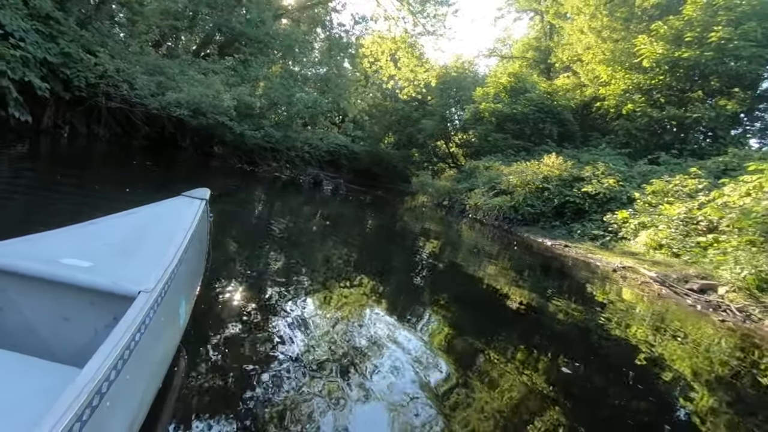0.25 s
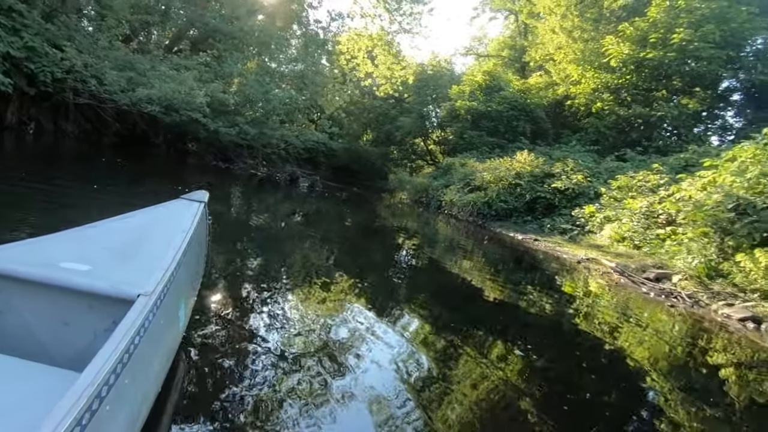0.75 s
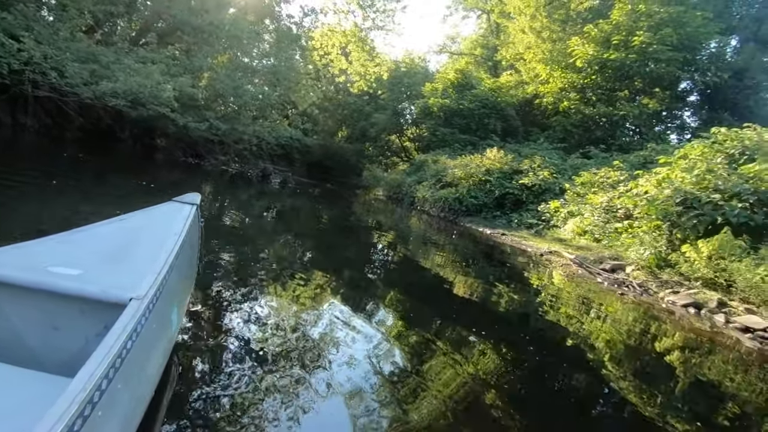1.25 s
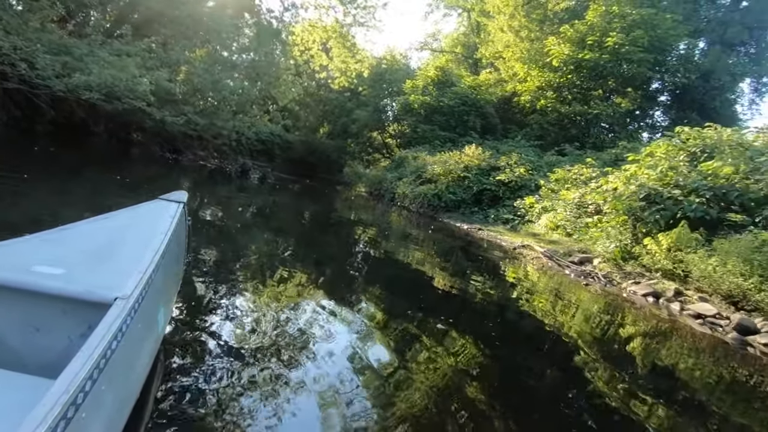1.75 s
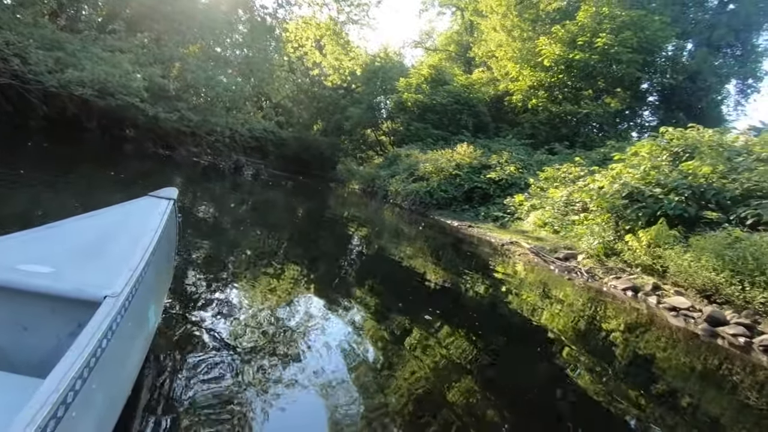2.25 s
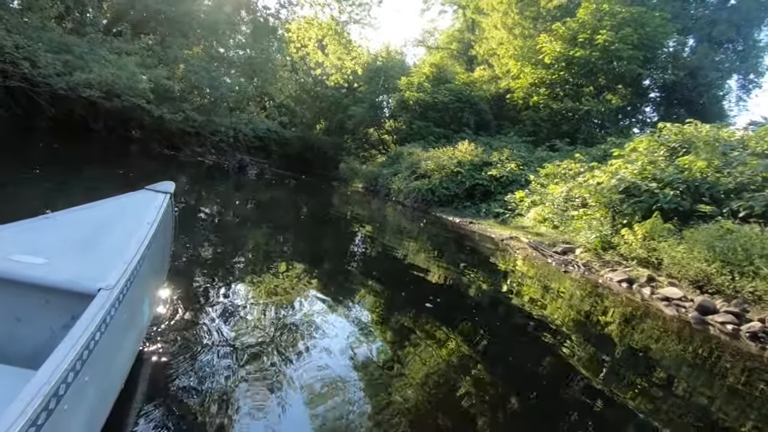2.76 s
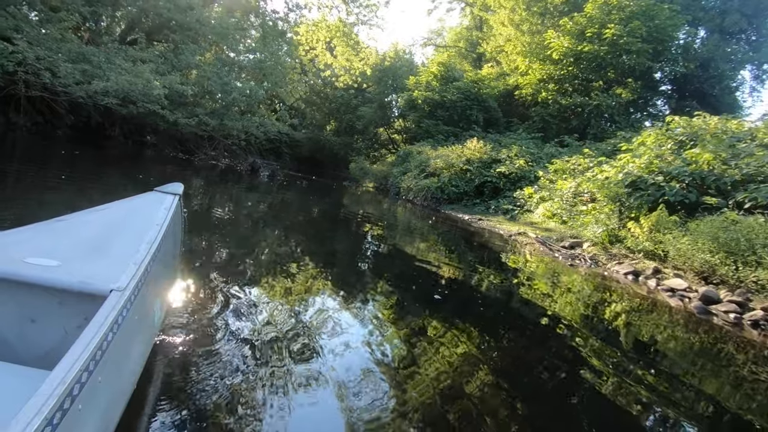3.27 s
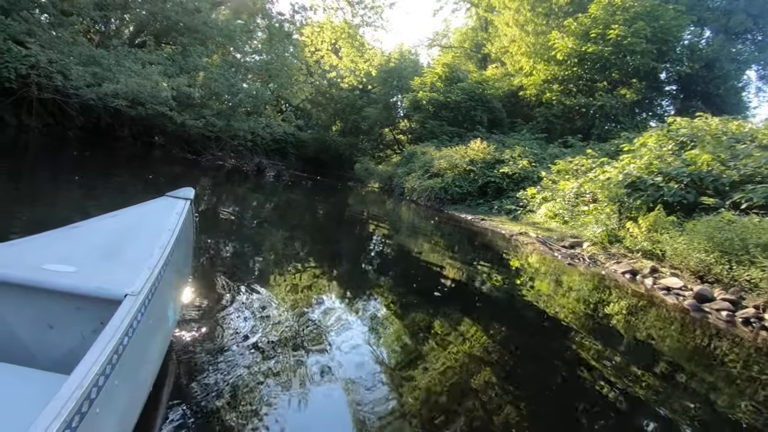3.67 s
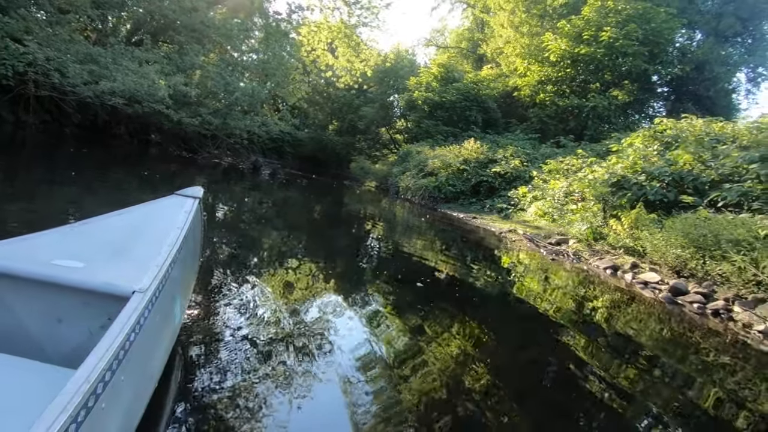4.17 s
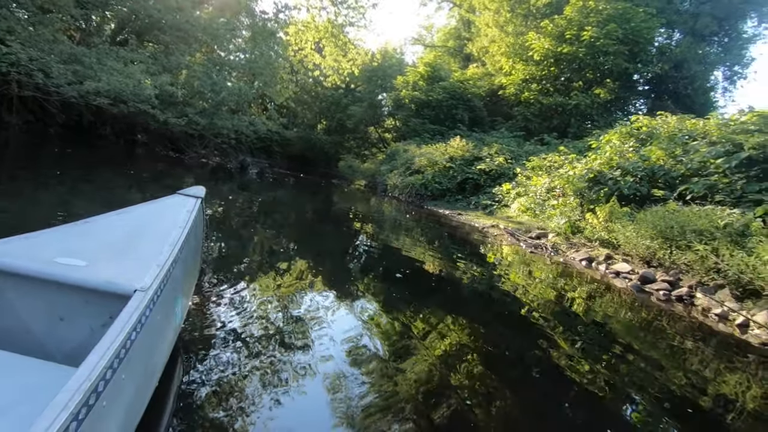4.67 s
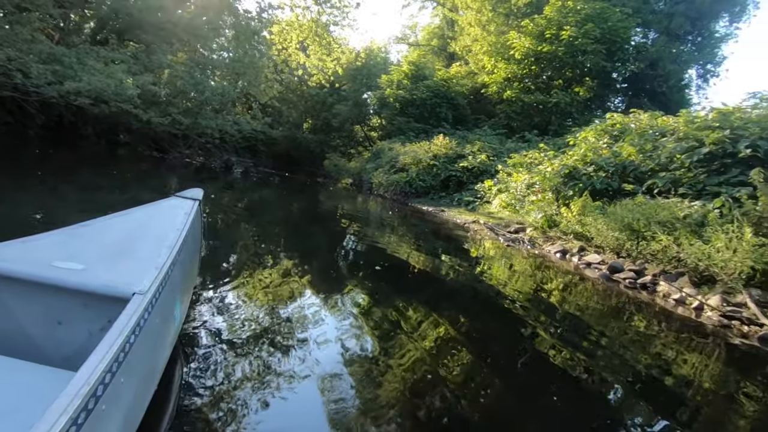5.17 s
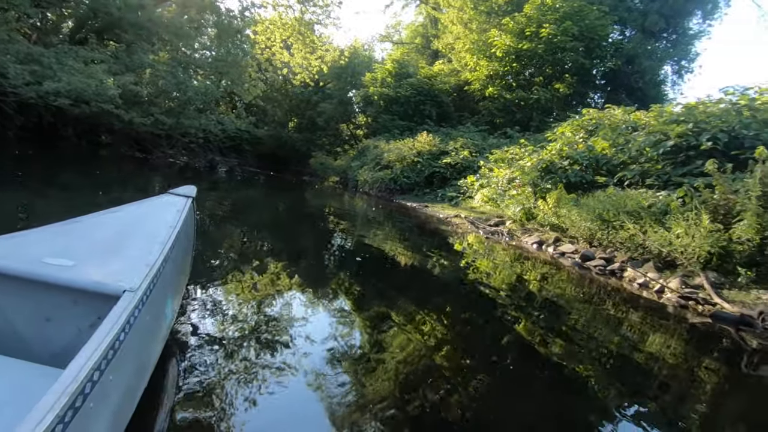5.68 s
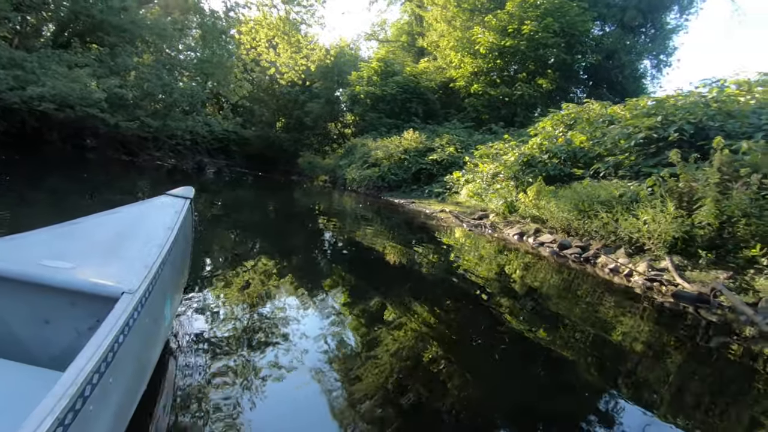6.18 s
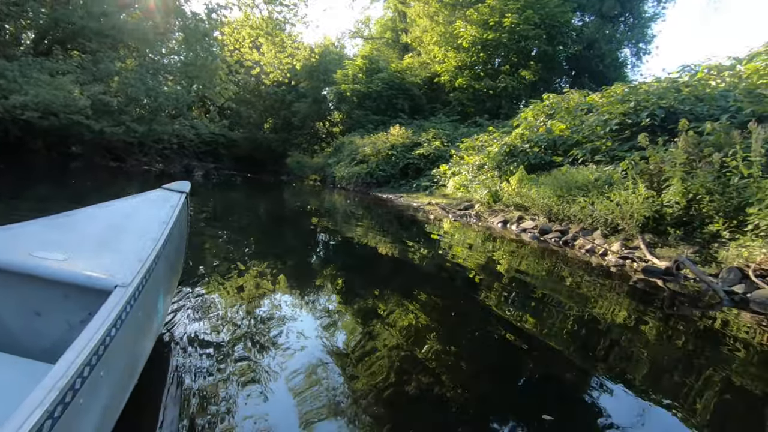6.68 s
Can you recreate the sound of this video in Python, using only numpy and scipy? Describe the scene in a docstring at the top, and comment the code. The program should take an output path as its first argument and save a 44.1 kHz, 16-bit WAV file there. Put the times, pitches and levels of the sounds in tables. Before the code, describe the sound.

A camera mounted on a metal canoe picks up quiet outdoor air, rumbling and gently hissing, with a wavering motor far away. After light plops and a crisp flutter of cloth, the hull is bumped: a moderate thud, then several loud, boomy, clattering blows with short rings. The stereo ambience narrows to a muffled centre, with slight wind thumps, cloth rustle and one short sharp bang.

```python
"""A low rumble, leaves and insects over a calm river with a far engine humming; bubbles plop at the hull, then
knocks on a drifting aluminium canoe boom into the camera through its mount, as decaying modes and noise bursts.
Cloth snaps and brushes near the microphone as shaped bright noise; the air is coloured, patchy noise.
The camera fades from its pair of ports to one sheltered port, and its gain control ducks after loud knocks."""
import sys
import numpy as np
from scipy import signal
from scipy.fft import rfft, irfft, next_fast_len
from scipy.io import wavfile
from scipy.ndimage import uniform_filter1d, minimum_filter1d, map_coordinates

SR = 44100
rng = np.random.default_rng(int(sys.argv[2]) if len(sys.argv) > 2 else 0)


def unload_wav(signal):
    """Save mono or channel-first audio to the path in sys.argv[1] as 16-bit WAV at rate SR, clipped to [-1, 1]."""
    wavfile.write(
        sys.argv[1],
        SR,
        np.round(np.clip(np.atleast_2d(signal).T, -1, 1) * 32767).astype(np.int16),
    )


N = 305877


def amp(db):
    """Gain of a level in dB."""
    return 10 ** (np.asarray(db) / 20)


def unit(x):
    """x at rms 1."""
    return x / np.sqrt(np.mean(x ** 2) + 1e-20)


def along(points, hz):
    """Each column after the frequency, read on a log axis."""
    f, *cols = np.transpose(points)
    return [np.interp(np.log(hz + 1), np.log(f + 1), c) for c in cols]


def wobble(rate):
    """A smooth random curve, rate knots a second."""
    knots = rng.standard_normal(int(N * rate / SR) + 4)
    return map_coordinates(knots, [np.arange(N) * rate / SR])


def bells(rows):
    """Gain of a sum of bell-shaped swells; each width is the standard deviation in seconds."""
    t = np.arange(N) / SR
    return sum(amp(db) * np.exp(-.5 * ((t - s) / width) ** 2) for s, db, width in rows)


def strokes(rows):
    """Gain of a sum of rise-hold-fall shapes."""
    t = np.arange(N) / SR
    gain = np.zeros(N)
    for s, db, rise, hold, fall in rows:
        shape = np.interp(t - s, np.cumsum([0, rise, hold, fall]), [0, 1, 1, 0])
        gain += amp(db) * np.sin(np.pi / 2 * shape) ** 2
    return gain


def filtered(x, response):
    """x times a complex response of frequency."""
    m = next_fast_len(N + 8192)
    return irfft(rfft(x, m) * response(np.fft.rfftfreq(m, 1 / SR)), m)[..., :N]


def patchy(count, patchy_db):
    """White noises, of rms 1 together, under one field of random gain patches in time and frequency."""
    z = signal.stft(rng.standard_normal((count, N)), nperseg=512)[2]
    field = uniform_filter1d(rng.standard_normal(z.shape[1:]), size=6, axis=0)
    field = uniform_filter1d(field, size=14, axis=1)
    return unit(signal.istft(z * amp(patchy_db * unit(field)), nperseg=512)[1][:, :N])


def coloured(spectrum, patchy_db):
    """One noise of rms 1 with this spectrum."""
    white = patchy(count=1, patchy_db=patchy_db)[0]
    return unit(filtered(white, lambda hz: amp(along(spectrum, hz)[0])))


def at_pair(table, inside, patchy_db):
    """Noise at two ports: the left hears part of what the right hears, shifted in phase, and part of its own."""
    def paths(hz):
        left_db, right_db, alike, lead = along(table, hz)
        alike = np.clip(alike, 0, 1)
        per_hz = np.sqrt(SR / 2) * inside(hz)
        left_shared = amp(left_db) * alike * np.exp(1j * lead)
        left_own = amp(left_db) * np.sqrt(1 - alike ** 2)
        return per_hz * [left_shared, left_own, amp(right_db)]
    shared, own = patchy(count=2, patchy_db=patchy_db)
    heard = filtered(np.array([shared, own, shared]), paths)
    return np.array([heard[0] + heard[1], heard[2]])


def river_air():
    """Far rumble that comes in lumps, and a smoother rush of leaves and insects above it, at the pair of ports."""
    # both: f/Hz, left and right level/dB per Hz before the layer's gain, likeness/0-1, left lead/rad
    rumble_spectrum = [(22.0, -60, -69, 0.6, -0.5), (41.7, -59.5, -60.5, 0.7, -0.2),
                       (59.5, -47, -51.5, 1, -0.36), (129, -59, -56.5, 0.84, -0.54),
                       (189, -60.5, -58.5, 0.7, -0.83), (265, -70, -66, 1, -0.54),
                       (340, -71.5, -67, 0.7, -0.37), (407, -74, -71, 0.8, -0.36),
                       (536, -83.5, -72.5, 0.5, 0.2)]
    leaves_spectrum = [(563, -86.5, -74, 0.19, 0.2), (656, -69.5, -68, 0.73, 4),
                       (770, -78, -69.5, 0.93, 1.5), (1010, -73, -70, 0.96, 2),
                       (1354, -76.5, -74, 0.84, 1.48), (2265, -87, -85.5, 0.14, 0.7),
                       (3290, -95.5, -93.5, 0.52, 0.4), (4330, -102.3, -99.5, 0.52, 0.5),
                       (4970, -99.2, -94.5, 0.19, 3.5), (5490, -96.5, -86.5, 0.74, 4.5),
                       (6140, -99.0, -98, 0.28, 3.5), (6700, -93, -96, 0.31, 4.5),
                       (7600, -104.4, -107.6, 0.13, 4.5), (8100, -113.8, -115.4, 0.06, -2),
                       (9200, -118.5, -118.4, 0.03, 7.5), (12450, -123.5, -123.5, 0.01, -7.5),
                       (14500.0, -140.0, -140.0, 0.06, -5.5)]
    # the rumble swells once, around the second loud knock:
    # t/s, added level/dB against steady, standard deviation/s
    rumble_swell = (5.09, 8.8, 0.2)
    rumble_db, leaves_db = -0.9, 0.16
    # the pair's rush of leaves fades from then on, on top of the handover
    leaves_fade_s, leaves_fade_db_per_s = 4.85, 10.5
    leaves_fade_db = leaves_fade_db_per_s * np.maximum(0, np.arange(N) / SR - leaves_fade_s)
    rumble = at_pair(rumble_spectrum, lambda hz: hz < 540, patchy_db=1.0)
    rumble = rumble * (1 + bells([rumble_swell])) * amp(rumble_db + 1.2 * wobble(1.8) + 0.13 * wobble(11.0))
    leaves = at_pair(leaves_spectrum, lambda hz: hz >= 540, patchy_db=0.5)
    return rumble + leaves * amp(leaves_db - leaves_fade_db + 0.78 * wobble(1.7))


def sheltered_air():
    """Steady background noise at the single port, with a low wind thump under a light breeze and two gusts."""
    # background and wind: f/Hz, relative level/dB per Hz
    background_spectrum = [(12, -28), (22, 0), (64, -8.5), (160, -4), (260, -9.5), (400, -16), (600, -23),
                           (1000, -20), (1700, -27), (2400, -38), (3300, -50.5), (4300, -44.5), (5300, -40),
                           (6800, -46.5), (7600, -61), (9000, -68.5), (14000, -91)]
    wind_spectrum = [(12, -21), (30, 8), (70, 4.5), (120, -16), (250, -47.5), (600, -120)]
    # gusts: t/s, peak level/dB added to the breeze, standard deviation/s
    gusts = [(6.2, -35, 0.03), (6.8, -37.5, 0.1)]
    background_db, breeze_db = -33.5, -40
    background = amp(background_db) * coloured(background_spectrum, patchy_db=0.9)
    return background + (amp(breeze_db) + bells(gusts)) * coloured(wind_spectrum, patchy_db=-1.0)


def far_engine():
    """A distant wavering hum with one overtone, and a lower drone that passes with rising pitch."""
    # hum swells: t/s, peak level/dB added to the steady hum, standard deviation/s
    swells = [(.7, -47, 0.073), (1.4, -49.5, 0.14), (1.85, -44.5, 0.12), (3.05, -44, 0.15),
              (5.78, -38, 0.067), (5.95, -33, 0.11), (6.88, -35, 0.14)]
    hum_hz, sag_hz_per_s, hum_db = 253, 2.3, -57.5  # pitch at the start, its slow fall, level between swells
    overtone_db, overtone_db_per_s = -7.5, 9.5  # against the fundamental: at the end, and growth up to there
    drone_s, drone_db, drone_width_s = 0.75, -36, 0.18  # its loudest moment
    drone_hz, drone_rise_hz_per_s = 172, 37  # pitch at that moment
    t = np.arange(N) / SR
    phase = 2 * np.pi * np.cumsum(hum_hz - sag_hz_per_s * t + 0.78 * wobble(12)) / SR
    overtone = amp(overtone_db + overtone_db_per_s * (t - t[-1])) * np.sin(2 * phase)
    hum = (amp(hum_db) + bells(swells)) * amp(0.6 * wobble(10.0)) * (np.sin(phase) + overtone)
    hz = drone_hz + drone_rise_hz_per_s * (t - drone_s) + 3.1 * wobble(14.0)
    drone = np.sin(2 * np.pi * np.cumsum(hz) / SR)
    return hum + bells([(drone_s, drone_db, drone_width_s)]) * amp(2.2 * wobble(16.0)) * drone


def bubbles():
    """Bubbles at the hull: soft decaying sines whose pitch rises a little."""
    # plops: t/s, starting f/Hz, level/dB, t60/s
    plops = [(1.931, 501, -32, 0.13), (2.121, 472, -36.5, 0.12)]
    out, t = np.zeros(N), np.arange(SR // 4) / SR
    for s, hz, db, t60 in plops:
        envelope = amp(db - 60 * t / t60) * (1 - np.exp(-t / 0.0063))
        out[round(s * SR):][:len(t)] += envelope * np.sin(2 * np.pi * hz * t * (1 + 0.35 * t))
    return out


def brushing_cloth():
    """Cloth sliding close to the single port, and a rougher scuff: noise with a fast random flutter."""
    # slides and scuffs: t/s, level/dB, rise/s, hold/s, fall/s
    slides = [(5.8, -54.5, 0.31, 0.23, 0.15), (6.5, -63, .08, .05, 0.073)]
    scuffs = [(6.77, -55.5, 0.015, .03, .03), (6.822, -45, 0.016, .065, .02), (6.905, -50, 0.026, .1, .02)]
    # their colours: f/Hz, relative level/dB per Hz
    slide_spectrum = [(1500, -27), (2500, -7), (3300, -12.5), (4300, -6.5), (5300, -8.5), (6400, -8.5),
                      (7200, -14.5), (8500, -22.5), (9500, -33), (12000, -47), (15000, -63)]
    scuff_spectrum = [(700, -38), (1300, -1), (1800, -6), (2450, -11), (2750, -8), (3400, -12), (3900, -7),
                      (4250, -2), (4700, -6), (5400, -9), (6420, -9), (7200, -19), (9300, -29), (9900, -45),
                      (14000, -75)]
    slide = amp(0.98 * wobble(60) + 0.99 * wobble(450)) * coloured(slide_spectrum, patchy_db=1.2)
    scuff = amp(1.7 * wobble(70) + 1.4 * wobble(600)) * coloured(scuff_spectrum, patchy_db=2.5)
    return strokes(slides) * slide + strokes(scuffs) * scuff


def cloth_snaps():
    """Cloth snaps: short rough puffs of bright noise, separate at each port of the pair."""
    # snaps: t/s, level/dB before the colour, t60/s
    snaps = [(3.052, -44, 0.11), (3.056, -55, .5), (3.077, -45, .08), (3.101, -54, 0.092),
             (3.144, -43, .08), (3.168, -35.5, 0.052), (3.19, -51.5, 0.46), (4.215, -46, 0.052),
             (4.225, -30.5, 0.07), (4.237, -40, 0.044), (4.261, -41, 0.084), (4.677, -41, 0.043),
             (5.287, -41.5, 0.07), (6.78, -49, .04)]
    # their colour: f/Hz, gain/dB
    snap_spectrum = [(600, -45), (1200, -1), (2200, 1.5), (3200, -3.5), (5500, -3), (7500, -2),
                     (9000, -18.5), (12000, -26.5), (15000, -35)]
    shape, t = np.zeros(N + SR), np.arange(SR // 4) / SR
    for s, db, t60 in snaps:
        shape[round(s * SR):][:len(t)] += amp(db - 60 * t / t60) * (1 - np.exp(-t / 0.00068))
    noise = filtered(patchy(count=2, patchy_db=0.0), lambda hz: amp(along(snap_spectrum, hz)[0]))
    return shape[:N] * amp(2.3 * wobble(1100)) * noise


def hull():
    """Each blow rings the modes of its spot; the big low panels take longest to swing up."""
    # hull modes: f/Hz, t60/s before the blow's damping, level/dB when struck at spot a, b, c, d
    modes = [(34.07, 1.0, -17.5, -15.5, -36.5, -37.5), (48.9, 1.0, -25.5, -22, -32.5, -46),
             (81.2, 1, -29, -16, -43, -48.5), (99.28, 0.84, -17, -7.5, -24.5, -47),
             (109.8, 0.97, -36, -29, -20.5, -41), (119.04, 0.85, -15.5, -14, -28.5, -33.5),
             (141.04, 0.77, -29, -10.5, -33.5, -28), (156.5, 0.5, -21, -33, -26.5, -41.5),
             (190.9, 0.93, -22, -13, -22.5, -25.5), (208.3, 1, -31, -21, -22, -31),
             (243, 0.38, -41, -33, -30, -26), (258, 0.76, -38, -22.5, -34, -33.5),
             (275, 0.94, -41, -40, -45, -36), (300.5, 0.53, -25.5, -25, -43.5, -38.5),
             (356.5, 0.27, -42, -43.5, -34, -21.5), (396, 0.47, -54, -47, -45.5, -26.5),
             (419, 0.15, -42, -54.5, -32.5, -30.5), (463, 0.75, -46, -49, -45, -39),
             (496, 0.35, -49, -60, -45, -26.5), (570, 0.53, -50, -51, -45, -39.5),
             (629, 0.61, -24.5, -33, -33, -46), (633.6, 0.59, -26, -23, -22.5, -48),
             (652, 0.69, -32.5, -30.5, -27.5, -52.5), (668.6, 0.24, -23.5, -17.5, -38.5, -44),
             (680, 0.46, -30.5, -21, -32.5, -43), (730, 0.39, -41.5, -27, -39.5, -42),
             (753, 0.14, -46, -37.5, -56, -37), (785, 0.2, -47, -39.5, -45.5, -34),
             (864, 0.36, -40, -37.5, -33, -54.5), (855, 0.46, -31.5, -19, -38, -59.5),
             (890, 0.44, -40, -18.5, -51, -67), (946, 0.45, -46, -34, -47, -59),
             (1260, 0.59, -62, -46.5, -58, -50), (1510, 0.44, -45.5, -39, -41.5, -66)]
    # blows: t/s, spot struck, strength/dB, damping factor, rise/s, cycles a mode needs to swing up,
    # weak modes' level/dB against the ring, first burst/dB, clatter level/dB, click level/dB,
    # time for which the big panels keep feeding each other before their ring falls away/s
    knocks = [(3.314, "a", 2.5, 0.66, 0.0043, 2.5, -12.5, 11.5, -39, -47, 0.18),
              (3.556, "a", -12.5, 0.8, 0.0052, 0.88, -8.5, -13.5, -56, -71.5, 0.078),
              (4.227, "c", -17, 1.7, .002, 3.6, -13, 17.5, -47, -63, .09),
              (4.557, "b", 13.5, 1.04, 0.0069, 3.53, -14.5, 8, -28, -29.5, 0.32),
              (4.643, "c", -22, 1.5, 0.0026, 3, -15, 0, -35, -51, 0.11),
              (4.974, "c", 17.5, 1.63, 0.0077, 2.5, -11.5, 15, -18.5, -33.5, .09),
              (5.09, "c", 11, 2.4, 0.011, 1.6, -18, -19, -46, -67, 0.13),
              (5.469, "d", -1.5, 4.3, 0.0066, 2.1, -5.5, -1, -54, -57, 0.073),
              (6.53, "d", 20.5, 1.57, 0.0013, 0.37, -10.5, 17, -17, -22, 0.11),
              (6.539, "d", 15, 1.9, .001, .3, -14, 11, -17.5, -23, .1)]
    # contacts that ring one heavily damped rib or panel: t/s, f/Hz, level/dB, t60/s
    pings = [(4.222, 2200, -44, 0.054), (4.643, 2150, -37, 0.065), (4.651, 2230, -41.5, .06),
             (4.975, 4370, -39.5, .04), (4.976, 1900, -31.5, .06), (4.982, 870, -16, .05),
             (4.984, 660, -4, .06), (4.987, 200, -2.5, .07), (3.32, 672, -15.5, 0.063),
             (6.5315, 329, 10.5, 0.032), (6.5389, 240, 9, 0.035)]
    # clatter of the contact, its bright edge, the dense weak modes: f/Hz, relative level/dB
    clatter_spectrum = [(400, -24), (900, 7), (1500, 8), (2000, 3.5), (2500, -11), (4000, -29), (8000, -63)]
    click_spectrum = [(1500, -24), (2800, -2), (4000, -3.5), (5500, -2.5), (7500, -14), (8500, -28.5),
                      (15000, -35.5)]
    weak_spectrum = [(15, 2), (30, -4), (60, 1), (150, 8), (310, -0.5), (400, -13.5), (550, -24.5),
                     (660, -13.5), (900, -31), (1100, -40), (1500, -41.5), (3000, -54), (6000, -85.5)]
    burst_t60_s, clatter_t60_s, click_t60_s = 0.14, 0.094, 0.03
    waver_db = 2.5  # loose ribs also make each mode swell and sink
    wash_rise_s_per_cycle = 0.0045  # weak modes fill in behind the blow, later when the swing-up is slow
    left_wash_db = 5  # the left port hears other weak modes, stronger against its faint ring
    out, t = np.zeros((2, N + SR)), np.arange(SR) / SR
    clatter_noise = coloured(clatter_spectrum, patchy_db=1)
    click_noise = coloured(click_spectrum, patchy_db=0.0)
    left_weak = amp(left_wash_db) * coloured(weak_spectrum, patchy_db=3.5)
    weak = np.array([left_weak, coloured(weak_spectrum, patchy_db=2.5)])
    hz, t60, *spots = np.transpose(modes)[:, :, None]
    small = hz > 560
    # neighbouring low modes start in opposite directions
    sign = np.where(small, 1, (-1.) ** np.arange(len(hz))[:, None])
    fade_out = np.minimum(1, (1 - t) / 0.47)  # each ring fades out fully by one second
    for s, spot, db, damping, rise, cycles, wash_db, burst_db, clatter_db, click_db, hold in knocks:
        start = round(s * SR)
        contact = (1 - np.exp(-t / rise)) ** 2
        held_t = t * t / (t + abs(hold))  # decay that starts late
        swing = 1 - np.exp(-t * hz / cycles)
        swing = swing * amp(-60 * np.where(small, t, 1.24 * held_t) * damping / t60)
        # small panels lose most of the blow in a first burst
        first_burst = amp(-4 - 14 * t) * (1 + amp(burst_db - 60 * t / burst_t60_s))
        swing = swing * np.where(small, first_burst, 1)
        # loose ribs make the pitch wander, most in small panels
        steps = np.cumsum(rng.standard_normal((len(hz), 41)), axis=1)
        wander = np.array([np.interp(t, np.linspace(0, 1, 41), k - k[0]) for k in steps])
        drift = np.where(small, .7, .3) * wander
        knots = rng.standard_normal((len(hz), 21))
        waver = np.array([np.interp(t, np.linspace(0, 1, 21), k) for k in knots])
        swing = swing * amp(waver_db * (1 - np.exp(-t / 0.06)) * waver)
        level = amp(db + spots["abcd".index(spot)])
        ring = (level * sign * swing * np.sin(2 * np.pi * hz * t + drift)).sum(axis=0)
        wash = amp(wash_db - 60 * held_t * damping / 0.63) * np.linalg.norm(level)
        wash = wash * (1 - np.exp(-t / (wash_rise_s_per_cycle * cycles)))
        wash = wash * np.roll(weak, start, axis=1)[:, :len(t)]
        clatter = amp(clatter_db - 60 * t / clatter_t60_s) * (1 - np.exp(-t / 0.0013))
        clatter = clatter * np.roll(clatter_noise, start)[:len(t)]
        click = amp(click_db - 60 * t / click_t60_s) * (1 - np.exp(-t / 0.0056))
        click = click * np.roll(click_noise, start)[:len(t)]
        out[:, start:][:, :len(t)] += contact * fade_out * (ring + wash) + clatter + click
    for s, ping_hz, db, t60 in pings:
        envelope = amp(db - 60 * t / t60) * (1 - np.exp(-t / .002))
        out[:, round(s * SR):][:, :len(t)] += envelope * np.sin(2 * np.pi * ping_hz * t)
    return out[:, :N]


def through_mount(knock):
    """The hull as the left port hears it: level and phase change with frequency."""
    # left port against the right one: f/Hz, level/dB, lead/rad
    mount = [(40, -9.5, -2), (99, -15.5, -1), (280, -17, -0.5), (447, -2.5, -1), (650, -4.5, -3),
             (850, -2.5, -3), (1360, 1, -1), (2000, 3, -5.5), (3400, -3.5, -5), (8000, 1, -4)]

    def response(hz):
        db, lead = along(mount, hz)
        return amp(db) * np.exp(1j * lead)
    return filtered(knock, response)


def scene():
    """The pair of ports hands over to the single port, which feeds both channels alike and hears less of the hull."""
    handover_s, handover_lasts_s = 4.414, 1.56
    air, hum, snaps, knocks = river_air(), far_engine(), cloth_snaps(), hull()
    pair = np.array([through_mount(knocks[0]), knocks[1]]) + air + snaps
    pair = pair + (hum + bubbles()) * amp([[-1.5], [1.5]])  # stronger on the right
    single = amp(-17) * knocks[1] + sheltered_air() + brushing_cloth() + snaps[0] + hum
    progress = np.clip((np.arange(N) / SR - handover_s) / handover_lasts_s, 0, 1)
    share = np.cos(np.pi / 2 * progress) ** 2
    return share * pair + (1 - share) * single


def gain_control(x, top_db, hold, release_db, attack):
    """Gain takes most of the excess off peaks above the top, holds, then climbs at a steady dB per second."""
    need = 0.89 * np.minimum(0, top_db - 20 * np.log10(np.abs(x).max(axis=0) + 1e-9))
    span = int(hold * SR) // 2 * 2 + 1
    held = minimum_filter1d(need, span, origin=span // 2)
    ramp = release_db * np.arange(N) / SR
    climb = np.minimum.accumulate(held - ramp) + ramp
    pole = np.exp(-1 / (attack * SR))
    return x * amp(signal.lfilter([1 - pole], [1, -pole], climb))


def record(dry):
    """Gain control, the camera's own hiss after it, a soft ceiling and the band limit."""
    # the camera's own noise: f/Hz, relative level/dB per Hz
    hiss_spectrum = [(2000, -34), (3000, -12.5), (4300, 0.5), (5400, 1.5), (6800, -2.5), (7600, -16.5),
                     (9000, -56)]
    hiss_db, top_hz = -79.5, 14900
    x = gain_control(dry, top_db=-5.5, hold=0.34, release_db=5.5, attack=0.00084)
    x = x + amp(hiss_db) * coloured(hiss_spectrum, patchy_db=-1.5)
    x = x / (1 + np.abs(x / 0.94) ** 6) ** (1 / 6)
    return filtered(x, lambda hz: hz < top_hz)


dry = scene()
out = record(dry)
unload_wav(out)
```